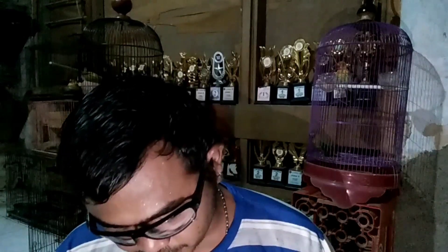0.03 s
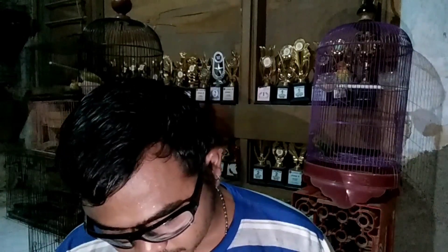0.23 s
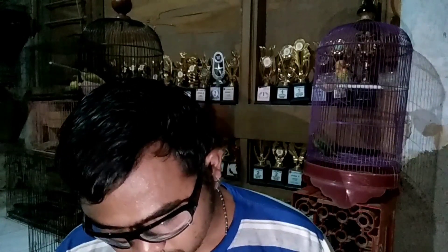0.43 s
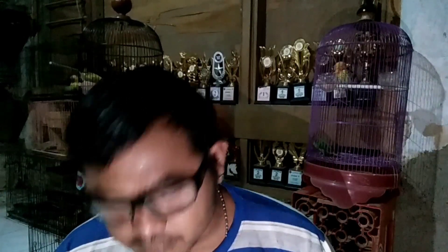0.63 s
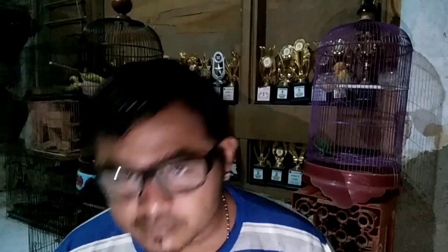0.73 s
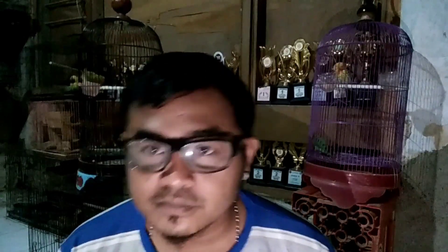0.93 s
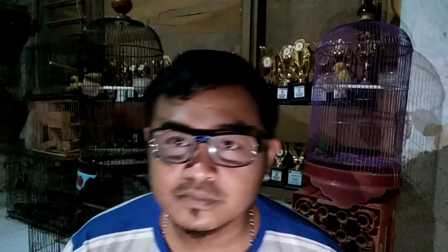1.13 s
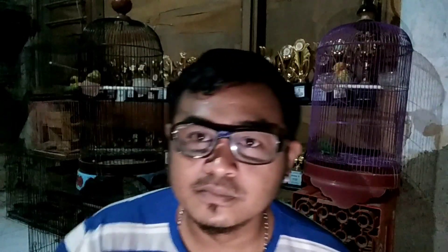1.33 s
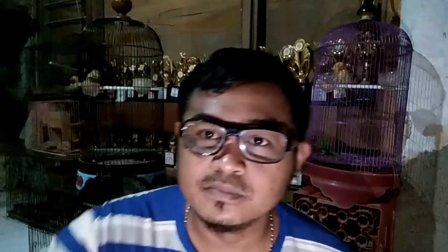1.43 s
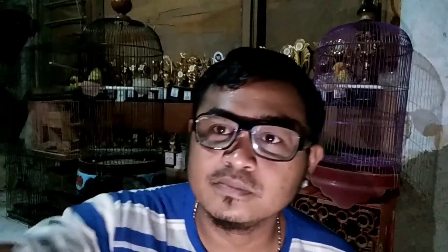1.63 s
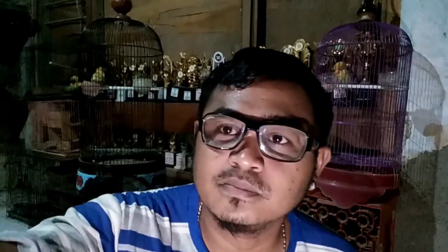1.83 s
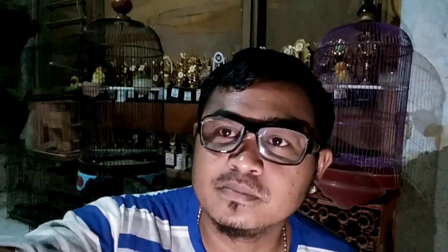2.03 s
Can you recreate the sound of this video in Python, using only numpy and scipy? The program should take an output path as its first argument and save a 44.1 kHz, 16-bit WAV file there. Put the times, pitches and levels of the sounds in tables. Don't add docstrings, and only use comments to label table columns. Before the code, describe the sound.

Small caged parrots give a few sharp chirps, then burst into loud overlapping whistles and chatter

```python
import sys
import numpy as np
from scipy import signal
from scipy.fft import rfft, irfft, next_fast_len
from scipy.io import wavfile
from scipy.ndimage import uniform_filter1d, minimum_filter1d, map_coordinates

SR = 44100
rng = np.random.default_rng(int(sys.argv[2]) if len(sys.argv) > 2 else 0)


def unload_audio(sound):
    columns = np.transpose(np.atleast_2d(sound))
    steps = np.round(np.clip(columns, -1, 1) * 32767)
    wavfile.write(sys.argv[1], SR, steps.astype(np.int16))


def undo_db(level):
    steps = np.asarray(level, float) / 20
    return 10 ** steps


N = 92036

# start in seconds, length in seconds, first pitch in Hz, last pitch in Hz, level in dB.
CLEAR_CHIRPS = [
    (.33, 0.0079, 6250, 5600, -16),
    (.334, 0.0064, 7450, 7070, -18.5),
    (.337, 0.0098, 6480, 5480, -18.5),
    (.343, 0.0089, 5804, 5120, -20.5),
    (.714, .007, 7310, 4530, -17.5),
    (.718, 0.0084, 7230, 6430, -25),
    (.72, 0.013, 4770, 5370, -19),
    (1.404, 0.0154, 1714, 1768, -32),
    (.592, 0.017, 5836, 6015, -25.5),
    (.64, 0.0083, 5850, 5700, -53),
]
# start in seconds, length in seconds, first pitch in Hz,
# last pitch in Hz, level in dB.
RASPY_CHIRPS = [
    (.869, 0.00726, 6600, 5300, -14.5),
    (.866, .005, 7600, 5300, -19),
    (.873, 0.009, 5410, 4550, -15.5),
    (.988, 0.0178, 3150, 2650, -31),
    (.992, 0.013, 5200, 5820, -22.5),
    (.996, 0.01354, 4750, 4250, -25.5),
    (1.008, .026, 4500, 3950, -25),
    (0.91, 0.0045, 6200, 8600, -26.5),
    (1.0, 0.0065, 3530, 3380, -37),
]
# start in seconds, length in seconds, first pitch in Hz, last pitch in Hz, level in dB.
SQUAWKS = [(1.463, 0.032, 2406, 2510, -33.5), (1.638, 0.0242, 2487, 2600, -30),
           (1.99, 0.043, 2818, 2720, -34.5), (1.418, 0.0158, 1969, 2094, -37),
           (1.43, 0.0454, 2166, 2310, -26), (1.465, 0.0403, 2385, 2431, -29),
           (1.52, 0.0313, 2076, 2213, -28.5), (1.63, 0.0263, 1965, 2003, -34.5),
           (1.648, 0.0167, 2446, 2509, -32.5), (1.68, 0.02, 2620, 2874, -42),
           (1.80, 0.0317, 1604, 1738, -42.5), (1.852, 0.058, 3010, 3152, -38.5),
           (1.9, 0.035063, 2984, 2351, -27.5), (1.935, 0.019, 2250, 2316, -29),
           (1.97, 0.06, 3000, 3070, -56), (2.03, 0.028, 2750, 2791, -31), (1.43, 0.0235, 3698, 3323, -30.5)]
# start in seconds, length in seconds, first pitch in Hz, last pitch in Hz, level in dB.
WHISTLES = [(1.408, 0.011, 3500, 3550, -37), (1.42, 0.011, 4030, 3770, -26.5),
            (1.632, 0.013, 5800, 5950, -24.5), (1.645, 0.026, 7330, 7840, -33),
            (1.68, 0.035, 7830, 7282, -33), (1.955, 0.041, 7300, 7268, -40),
            (1.99, 0.023, 7368, 6960, -32.5), (1.965, 0.025, 4650, 4800, -22),
            (2.03, 0.015, 8320, 8040, -34), (2.062, 0.021, 6077, 5940, -26),
            (2.01, 0.029, 4200, 4280, -23.5), (1.484, 0.031, 3450, 3346, -17.5),
            (1.46, 0.025, 4850, 4970, -38), (1.425, 0.0359, 4160, 4610, -35),
            (1.53, 0.038, 3350, 3326, -22.5), (1.553, 0.015, 3250, 3265, -18.5),
            (1.566, 0.024, 3400, 4033, -17.5), (1.53, 0.046, 6300, 6910, -34),
            (1.575, 0.037, 6900, 6820, -34.5), (1.575, 0.0314, 7700, 7220, -35),
            (1.58, 0.0219, 5062, 4536, -20), (1.59, 0.0495, 4540, 4407, -22), (1.62, 0.06, 3934, 3860, -26),
            (1.655, 0.026, 4930, 5060, -23), (1.675, 0.051, 4282, 3916, -21),
            (1.708, 0.026, 4130, 4141, -11.5), (1.74, 0.026, 4570, 4606, -20),
            (1.755, 0.022, 3300, 3321, -23.5), (1.77, 0.034, 4200, 4145, -35),
            (1.765, 0.026, 7200, 6360, -29), (1.785, 0.039, 4420, 4619, -22),
            (1.835, 0.05, 4573, 4215, -21.5), (1.825, 0.018, 6180, 5900, -27.5),
            (1.872, 0.035, 4000, 4104, -20.5), (1.93, 0.035, 4751, 4544, -21.5),
            (1.93, 0.025, 6950, 7420, -22), (1.945, .014, 5400, 5760, -11), (1.96, 0.027, 6300, 5830, -21),
            (1.99, 0.041, 5900, 5560, -21.5), (2.05, .016, 4600, 4595, -15.5),
            (2.063, 0.04, 4220, 4090, -6)]
CHIRP_OVERTONES = [-1, -12.5, -10.5]
SQUAWK_OVERTONES = [2, -7.5, -8, -19, -11.5, -21.5]
WHISTLE_OVERTONES = [-1, -20.5, -23.5, -16]
# time in seconds, level in dB, centre pitch in Hz.
FLOCK_COURSE = [
    (1.42, -46, 3840),
    (1.56, -63, 4520),
    (1.599, -35, 4502),
    (1.679, -30, 4395),
    (1.781, -38.5, 5100),
    (1.9, -30, 3900),
    (1.999, -31, 4960),
    (2.09, -28, 4283),
]
# frequency in Hz, time to decay by 60 dB in seconds.
ROOM_DECAY = [(500, .4), (2000, .33), (4000, .33), (8000, .34), (11000, .26), (15000, .22)]
# middle
# in seconds, half length in seconds, level in dB, brightness in dB per octave.
CLOTH_RUBS = [(0, 0.033, -41.5, 0), (0.106, 0.067, -55, 1), (0.396, 0.048, -41.5, -9),
              (0.57, 0.023, -49.5, -14.5), (0.701, 0.017, -33, 0.5), (0.79, 0.1, -48.5, -7),
              (0.882, 0.02, -31.5, -0.5), (0.946, 0.027, -44, -8), (1.025, 0.015, -30, 3),
              (1.079, 0.024, -40.5, 1.5), (1.177, 0.013, -49, 0), (1.254, 0.02, -45.5, -2)]
# frequency in Hz, level in dB.
CLOTH_SPECTRUM = [(350, -78), (600, -35), (1610, -10), (2800, -16.5), (3430, -12), (5260, -12), (5870, -8),
                  (10600, -29), (16000, -27.5)]
# start in seconds, peak level in dB, brightness in dB per octave, case ring in dB.
PHONE_TICKS = [
    (0.5508, -7.5, -5, 3),
    (.716, -23.5, -7.5, 17),
    (1.242, -37.5, -27, 19),
    (1.25, -23.5, -12.5, 19.5),
]
# start in seconds, length in seconds, pitch in Hz, level in dB.
DOVE_COOS = [
    (0.906, 0.223, 400, -56.5),
    (1.72, 0.086, 320.4, -40),
]
# frequency in Hz, level in dB.
BACKGROUND_SPECTRUM = [(15, -38), (25, -14), (114, -2), (679, -26), (798, -24.5), (1450, -25), (6000, -52),
                       (7800, -73.5), (13200, -120)]
# frequency in Hz, gain in dB.
MICROPHONE_RESPONSE = [(28, -22), (45, -14), (70, -5.5), (8000, 3), (10000, -3.5), (13500, -15.5),
                       (14600, -7.5), (15550, -9), (15750, -43), (17000, -46)]

CASE_HZ = 1257


def unit(x):
    return x / np.sqrt(np.mean(x ** 2) + 1e-20)


def along(points, hz):
    f, value = np.transpose(points)
    return np.interp(np.log(hz + 1), np.log(f + 1), value)


def filtered(x, response):
    size = next_fast_len(len(x) + 8192)
    f = np.fft.rfftfreq(size, 1 / SR)
    return irfft(rfft(x, size) * response(f), size)[:len(x)]


def peak(f, hz, width_hz):
    return 1j * f * width_hz / (hz * hz - f * f + 1j * f * width_hz)


def tilt(f, db_per_octave):
    return undo_db(db_per_octave * np.log2(np.maximum(f, 1300) / 1300))


def wobble(rate_hz, size):
    knots = rng.standard_normal(int(SR * rate_hz / 8000) + 8)
    return map_coordinates(knots, [np.arange(size) * rate_hz / SR], mode="wrap")


def sing(notes, overtones_db, attack_s, jitter, flutter_db, rasp=0, fizz_db=-90):
    out = np.zeros(N + SR)
    for start, length, first, last, db in notes:
        n = max(round(length * SR), 8)
        u = np.arange(n) / n
        pitch = (first + (last - first) * u) * (1 + jitter * wobble(305, n))
        phase = 2 * np.pi * np.cumsum(pitch) / SR
        ramps = np.clip(np.minimum(u, 1 - u) * length / attack_s, 0, 1) ** 2
        envelope = ramps * undo_db(db + flutter_db * wobble(255, n))
        tone = np.zeros(n)
        for k, overtone_db in enumerate(overtones_db):
            if max(first, last) * (k + 1) < .45 * SR:
                effort_db = 0.616 * min(db + 35.5, 0) * min(k, 2)
                tone += undo_db(overtone_db + effort_db) * np.sin((k + 1) * phase)
        fizz = np.diff(rng.standard_normal(n + 2), 2)
        voice = tone * (1 + rasp * wobble(894, n)) + undo_db(fizz_db) * fizz
        out[round(start * SR):][:n] += envelope * voice
    return out[:N]


def clear_chirps():
    return sing(CLEAR_CHIRPS, [0, -20, -28], attack_s=0.00117, jitter=0.017, flutter_db=1.5,
                rasp=0.22, fizz_db=-51)


def raspy_chirps():
    return sing(RASPY_CHIRPS, CHIRP_OVERTONES, attack_s=0.0011, jitter=0.0327, flutter_db=4,
                rasp=0.21, fizz_db=-18.5)


def squawks():
    return sing(SQUAWKS, SQUAWK_OVERTONES, attack_s=0.0042, jitter=0.0294, flutter_db=3.5,
                rasp=0.18, fizz_db=-15)


def whistles():
    return sing(WHISTLES, WHISTLE_OVERTONES, attack_s=.004, jitter=.012, flutter_db=2.5,
                rasp=0.34, fizz_db=-29)


def chatter(count):
    t, db, centre_hz = np.transpose(FLOCK_COURSE)
    place, stretch = rng.random((2, count))
    spread, glide, loudness = rng.standard_normal((3, count))
    start = t[0] + (N / SR - t[0]) * (np.arange(count) + place) / count
    length = 0.012609 * (.5 + stretch)
    first = np.interp(start, t, centre_hz) * np.exp(.26 * np.clip(spread, -2, 2))
    last = first * np.exp(0.16088 * glide)
    notes = zip(start, length, first, last, np.interp(start, t, db) + 2 * loudness)
    return sing(notes, WHISTLE_OVERTONES, attack_s=0.00082, jitter=0.0335, flutter_db=2,
                rasp=0.74, fizz_db=-30)


def parrots():
    calls = clear_chirps() + raspy_chirps() + squawks() + whistles() + chatter(count=260)
    return filtered(calls, lambda f: 1 / (1 + (1680 / (f + 1)) ** 8))


def room(x):
    uneven_db = 3 * wobble(705, SR)
    hz, t, z = signal.stft(rng.standard_normal(SR) * undo_db(uneven_db), SR, nperseg=128)
    power = uniform_filter1d(abs(z) ** 2, size=9, axis=1)
    z = z / np.sqrt(uniform_filter1d(power, size=3, axis=0))
    decay = undo_db(-60 * t / along(ROOM_DECAY, hz)[:, None])
    tail = signal.istft(z * decay, SR, nperseg=128)[1]
    tail = tail * (1 - np.exp(-np.arange(len(tail)) / (.001 * SR)))
    echoes = signal.fftconvolve(x, tail / np.linalg.norm(tail))[:N]
    return undo_db(-2.5) * x + undo_db(7) * echoes


def rustle():
    t, out = np.arange(N) / SR, np.zeros(N)
    for middle, half, db, bright_db in CLOTH_RUBS:
        grain_db = 2.5 * rng.standard_normal(N // 40 + 1).repeat(40)[:N]
        grains = rng.standard_normal(N) * undo_db(grain_db)

        def colour(f):
            case = 1 + undo_db(11.5) * peak(f, CASE_HZ, 89)
            return undo_db(along(CLOTH_SPECTRUM, f)) * tilt(f, bright_db) * case

        swell = np.exp(-((t - middle) / half) ** 2)
        out += undo_db(db) * swell * unit(filtered(grains, colour))
    return out


def ticks():
    out, t = np.zeros(N), np.arange(4096) / SR
    for start, db, bright_db, ring_db in PHONE_TICKS:
        decay = undo_db(-60 * t / .006) + undo_db(-34.5 - 60 * t / 0.18)
        crack = 2 * (t == 0) + rng.standard_normal(len(t)) * decay

        def colour(f):
            low_cut = (1j * f / (1400 + 1j * f)) ** 4
            return tilt(f, bright_db) * low_cut * (1 + undo_db(ring_db) * peak(f, CASE_HZ, 76.47))

        crack = filtered(crack, colour)
        out[round(start * SR):][:len(t)] += undo_db(db) * crack / abs(crack).max()
    return out


def cricket():
    t = np.arange(N) / SR - .09
    phrase_s, syllable_s = .1115, .0223
    swell_db = 7 * np.cos(2 * np.pi * t / phrase_s) + 4 * np.cos(2 * np.pi * t / syllable_s)
    clicks = rng.standard_normal(N) * (rng.random(N) < .1)
    clicks = clicks * undo_db(swell_db + 2 * wobble(6.93, N))
    scrape = clicks + 0.18 * rng.standard_normal(N)
    return undo_db(-49) * unit(filtered(scrape, lambda f: peak(f, 7080, 710) ** 3))


def dove():
    notes = [(start, length, hz, hz, db) for start, length, hz, db in DOVE_COOS]
    return sing(notes, [0], attack_s=.025, jitter=.01, flutter_db=1)


def traffic():
    noise = filtered(rng.standard_normal(N), lambda f: undo_db(along(BACKGROUND_SPECTRUM, f)))
    return undo_db(-51.5 + 1.2 * wobble(5, N)) * unit(noise)


def scene():
    return (room(parrots()) + rustle() + ticks() + cricket() + dove() + traffic())[None]


def top_cut(x):
    return signal.sosfilt(signal.butter(12, 16640, fs=SR, output="sos"), x)


def record(dry):
    x = dry[0] + undo_db(-67.5) * rng.standard_normal(N)
    x = filtered(x, lambda f: undo_db(along(MICROPHONE_RESPONSE, f)))
    hold = round(.008 * SR)
    gain = np.minimum(1, .95 / (abs(x) + 1e-9))
    gain = uniform_filter1d(minimum_filter1d(gain, 2 * hold), hold)
    return top_cut((x * gain)[None])


dry = scene()
out = record(dry)
unload_audio(out)
```